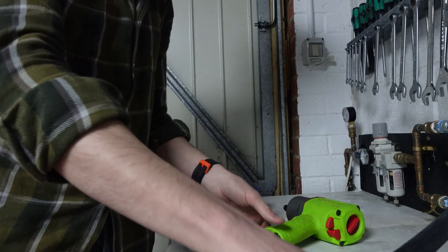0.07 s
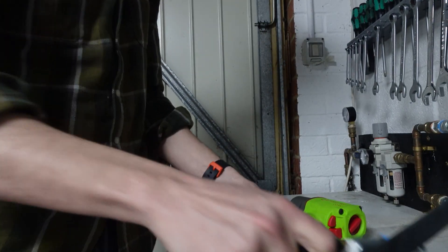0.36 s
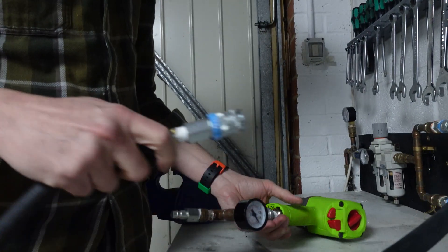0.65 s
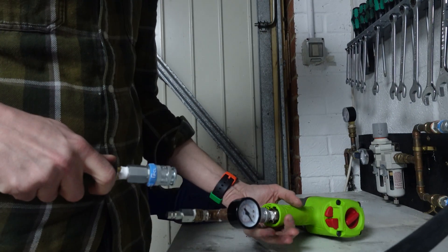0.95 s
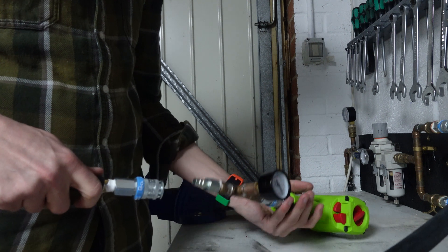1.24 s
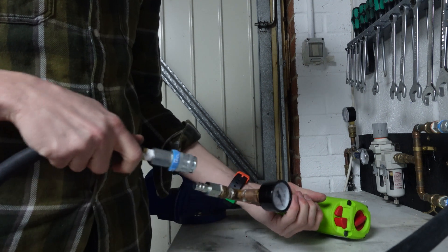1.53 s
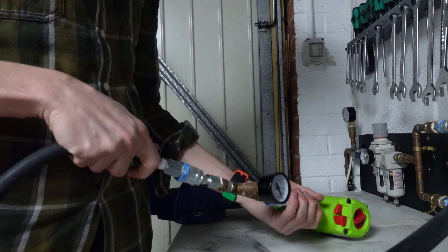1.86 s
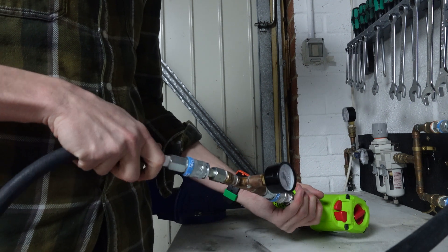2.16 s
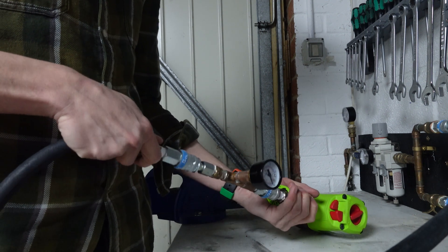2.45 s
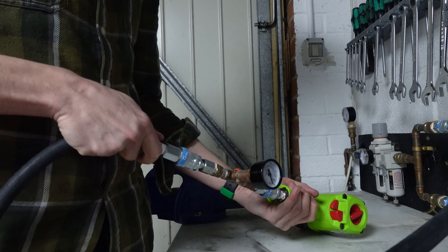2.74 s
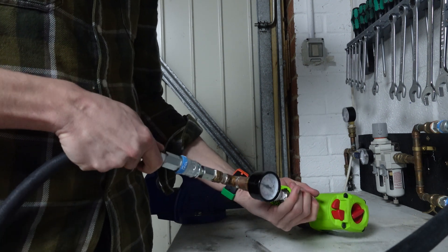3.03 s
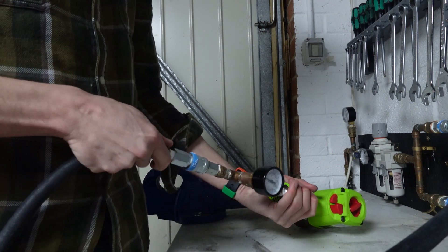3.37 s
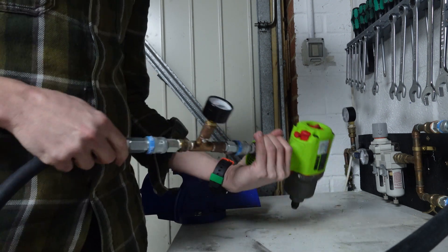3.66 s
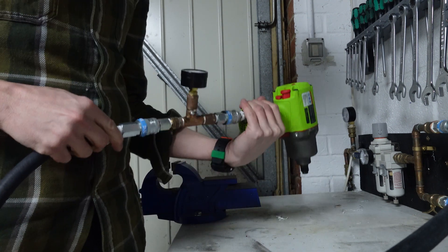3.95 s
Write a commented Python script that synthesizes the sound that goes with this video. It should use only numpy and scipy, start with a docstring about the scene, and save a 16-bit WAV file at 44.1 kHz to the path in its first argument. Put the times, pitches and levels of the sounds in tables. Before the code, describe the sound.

Metal clicks of an air hose being coupled to a tool, with dull workbench bumps.

```python
"""A small workshop, one microphone close to the bench, where an air hose is coupled to an air tool.
First the tool is dragged nearer and bumps on the booming bench top. The steel coupler taps and clicks
on the plug; around 3 s the seal leaks briefly, then the plug slides home and the coupler snaps shut
with a puff of air. Last, the tool is scraped off the bench and lifted, ringing faintly.
Sleeves and hose rustle throughout, over a low hum and the room's short echo."""
import sys
import numpy as np
from scipy import signal
from scipy.fft import rfft, irfft
from scipy.io import wavfile

SR = 44100
rng = np.random.default_rng(int(sys.argv[2]) if len(sys.argv) > 2 else 0)


def wrap_up_sound(samples):
    """Save the sound to the file named by the first command line argument, as 16-bit audio."""
    columns = np.atleast_2d(samples).T
    # keep every value between -1 and 1, then stretch to whole-number steps
    tamed = np.clip(columns, -1, 1)
    steps = np.round(tamed * 32767).astype(np.int16)
    wavfile.write(sys.argv[1], SR, steps)


N = 176400
TIME = np.arange(N) / SR

# modes of the steel coupler, damped by the hand: f/Hz, level/dB, t60/s
COUPLER_MODES = [(576, 14, 0.023), (1073, 4, 0.0083), (1490, 18, 0.035), (1767, 14, 0.0067),
                 (2085, 9.5, 0.019), (3205, 11.5, 0.025), (3635, 1.5, 0.07), (4550, 8, 0.028),
                 (5250, -1, 0.013), (6190, 5.5, 0.024), (6990, 7, 0.062), (11170, 0, 0.013)]
# edges of the four bands that colour a contact: f/Hz
CONTACT_EDGES = [300, 1200, 2500, 8800, 17000]
GRIP_SPREAD_DB, GRIP_DETUNE, GRIP_MAX_T60_S = 4.5, 0.055, .04
FIRST_IMPACT, REBOUNDS_PER_S = 3.24, 14000


def contact(bands_db, decay_s):
    """A hard impact and a run of tiny rebounds ring the coupler; the grip alters each touch's ring."""
    t = TIME[:SR // 8]
    force = rng.standard_normal(len(t)) * (rng.random(len(t)) < REBOUNDS_PER_S / SR)
    force *= np.exp(-t / decay_s)
    force[0] = FIRST_IMPACT
    modes = [(hz * (1 + GRIP_DETUNE * rng.uniform(-1.02, 1)),
              db + GRIP_SPREAD_DB * rng.normal(),
              min(t60, GRIP_MAX_T60_S)) for hz, db, t60 in COUPLER_MODES]
    steel = force + resonate(force, modes)
    click = sum(from_db(db) * unit_rms(band(steel, low, high, order=3))
                for db, low, high in zip(bands_db, CONTACT_EDGES, CONTACT_EDGES[1:]))
    return click * np.sqrt(.004 * SR / len(t))  # a band's level is its energy as an rms over 4 ms


# bright steel clicks of the coupler, and dull knocks and catches of the tool on the bench:
# t/s, level/dB in each of the four contact bands (low to high), chatter decay/s
TAPS_AND_KNOCKS = [(0.119, -35, -42, -58, -55, 0.0056), (0.233, -29.5, -34, -38, -47, 0.0089),
                   (0.262, -31, -36, -42, -52, 0.005), (0.284, -31, -37, -35, -42, 0.002),
                   (0.3133, -23, -33, -51, -64, 0.0081), (0.436, -44, -50, -38, -39.5, 0.0051),
                   (0.508, -47, -44, -51, -54, 0.013), (0.535, -65, -49, -47, -60, 0.0063),
                   (0.692, -40.5, -35, -41, -49, 0.012), (1.030, -37.5, -50, -78, -86, 0.0019),
                   (1.164, -55, -45.5, -54, -59.5, 0.0056), (1.228, -48, -66, -81, -80, 0.0054),
                   (1.4395, -37.5, -34, -41, -43.5, 0.0067), (1.461, -33, -28.5, -35.5, -39, 0.0074),
                   (1.494, -37.5, -33.5, -41.5, -48, 0.019), (1.520, -50, -39, -45.5, -50.5, 0.0069),
                   (1.647, -46, -41, -49, -54.5, 0.0025), (1.8732, -37.5, -30, -39.5, -57, 0.0047),
                   (1.9204, -43.5, -37.5, -29.5, -45, 0.0043), (1.958, -47, -39, -60, -71, 0.004),
                   (1.966, -41, -31.5, -39, -51, 0.0075), (2.2111, -34.5, -39.5, -76, -99, 0.0013),
                   (2.337, -49.5, -49, -59.5, -64, 0.0034), (2.494, -50, -38, -40, -54, 0.0089),
                   (2.5153, -39, -27, -31.5, -43, 0.0029), (2.9231, -54, -52, -50.5, -55.5, 0.0056),
                   (3.1985, -36, -39.5, -46.5, -51, 0.0045), (3.4229, -38, -32.5, -31.5, -50, 0.0079),
                   (3.4427, -45.5, -33.5, -37, -54, 0.0025), (3.452, -41, -30.5, -42.5, -46, 0.0024),
                   (3.51, -50, -34, -49, -58, 0.011), (3.5522, -26.5, -26, -49, -60, 0.001)]
RATTLE_DB, RATTLE_FALL_DB_PER_S = -3.5, 344


def taps_and_knocks():
    """The coupler clicks, the tool knocks and catches; the low part of each rattles on in the bench."""
    out, t = np.zeros(N), TIME[:SR // 5]
    fade = from_db(-RATTLE_FALL_DB_PER_S * t)
    for s, *bands_db, decay_s in TAPS_AND_KNOCKS:
        rattle = unit_rms(band(rng.standard_normal(len(t)), 280, 800)) * fade
        add(out, s, contact(bands_db, decay_s))
        add(out, s, from_db(bands_db[0] + RATTLE_DB) * rattle)
    return out


# air leaking past the seal, then spitting past the plug: t/s, level/dB
LEAK_LEVEL = [(2.94,-84),(2.985,-72),(3.01,-54),(3.035,-53),(3.06,-81),(3.09,-81)]
SPIT_LEVEL = [(3.232,-56),(3.242,-33.5),(3.256,-28.5),(3.262,-29.5),(3.270,-50)]
# their spectra: f/Hz, relative level/dB
LEAK_SPECTRUM = [(1500,0.5),(3300,-5.5),(6500,-13),(8500,-18),(11000,-7),(12300,5),(13400,-3),(15000,-13)]
SPIT_SPECTRUM = [(500,-9),(1000,-6.5),(1700,-0.5),(2600,-8),(5000,-10.5),(13000,-27.5)]
FLUTTER_BAND_HZ, FLUTTER_DEPTH = (150, 600), 0.23


def escaping_air():
    """The seal hisses briefly, then air spits roughly as the entering plug opens the valve."""
    flutter = np.exp(FLUTTER_DEPTH * unit_rms(band(rng.standard_normal(N), *FLUTTER_BAND_HZ)))
    leak = envelope(LEAK_LEVEL) * noise(LEAK_SPECTRUM)
    spit = envelope(SPIT_LEVEL) * unit_rms(flutter * noise(SPIT_SPECTRUM))
    return leak + spit


# the locking sleeve's snap: level/dB in each of the four contact bands
SNAP_BANDS = [-55, -44, -32, -22.5]
# the puff of air after it: f/Hz, relative level/dB
PUFF_SPECTRUM = [(900,-11),(1700,-12),(3500,-18.5),(5200,-7),(8000,-15),(11000,-16),(13000,-2.5),(15000,-18)]
SNAP_AT_S, SNAP_DECAY_S = 3.2652, 0.00075
PUFF_DB, PUFF_FALL_DB_PER_S, PUFF_ATTACK_S = -36, 204, .003


def latch():
    """The coupler's sleeve snaps forward and a puff of air dies away."""
    snap = np.zeros(N)
    add(snap, SNAP_AT_S, contact(SNAP_BANDS, SNAP_DECAY_S))
    t = np.maximum(TIME - SNAP_AT_S, 0)
    puff_gain = from_db(PUFF_DB - PUFF_FALL_DB_PER_S * t) * np.minimum(t / PUFF_ATTACK_S, 1)
    return snap + puff_gain * noise(PUFF_SPECTRUM)


# the tool's bumps: t/s, level/dB, f/Hz, decay/s
TOOL_BUMPS = [(0.446,-16.5,201,0.004), (0.473,-21,82.5,0.024), (0.528,-22.5,108.5,0.015),
              (0.702,-25.5,194,0.004), (0.828,-16,126,0.0079), (1.031,-14.5,155.4,0.0099),
              (1.079,-21,87,0.04), (1.215,-27,167,0.0089), (1.278,-15.5,124,0.014), (1.463,-17,206,0.004),
              (1.499,-23,126,0.015), (1.875,-32.5,137,0.028), (1.972,-22.5,161,0.0073),
              (2.212,-10.5,164,0.0043), (2.253,-17,124.6,0.016), (2.3,-25,72.5,0.017),
              (2.493,-17,153,0.0072), (2.549,-14.5,174.6,0.005), (2.837,-27,127,0.017),
              (2.926,-18.5,175,0.0024), (2.994,-22.5,129,0.017), (3.085,-30.5,168.3,0.041),
              (3.206,-19.5,171.7,0.016), (3.228,-20.5,219,0.0064), (3.314,-15.5,170.4,0.014),
              (3.456,-16,156,0.017), (3.505,-19,194,0.01), (3.553,-10.5,202,0.0063),
              (3.614,-20.5,134.3,0.059)]
BUMP_ATTACK_S, BUMP_LOWPASS_HZ = 0.00085, 5800


def tool_bumps():
    """The tool bumps on the bench and in the hand, a few dull cycles each time."""
    thuds, t = np.zeros(N), TIME[:SR // 3]
    attack = 1 - np.exp(-t / BUMP_ATTACK_S)
    for s, db, hz, decay_s in TOOL_BUMPS:
        add(thuds, s, from_db(db) * np.sin(2 * np.pi * hz * t) * attack * np.exp(-t / decay_s))
    return lowpass(thuds, BUMP_LOWPASS_HZ)


# the tool dragged over the bench, one curve per stroke: t/s, level/dB
DRAG_STROKES = [
    [(.115,-76),(.121,-37),(.15,-43),(.183,-45),(.194,-27.5),(.29,-28.5),(.33,-39),(.40,-39.5),(.45,-76)],
    [(1.228,-40),(1.26,-43),(1.318,-50.5),(1.330,-38.5),(1.39,-46.5),(1.43,-54)],
    [(3.13,-53),(3.21,-44.5),(3.39,-75),(3.46,-41.5),(3.54,-41)],
    [(3.55,-47),(3.567,-27),(3.68,-41),(3.76,-68)],
]
# scrape of its housing and of its hard nose: f/Hz, relative level/dB
HOUSING_SPECTRUM = [(200,-2),(330,6.5),(460,6.5),(900,-4),(1600,-21.5),(2400,-22.5),(4000,-38.5),(9000,-44.5)]
NOSE_SPECTRUM = [(800, 2.5), (1750, 0.5), (2500, -12), (3800, -14.5), (8000, -46)]
NOSE_DB, SLIPS_PER_S, SLIP_SPREAD_DB = -4.5, 1000, 4.5


def tool_drags():
    """The housing judders over the bench top; the hard nose adds grit to the last stroke."""
    housing = coloured(stick_slip(), HOUSING_SPECTRUM) * sum(map(envelope, DRAG_STROKES))
    nose = coloured(stick_slip(), NOSE_SPECTRUM) * envelope(DRAG_STROKES[-1])
    return housing + from_db(NOSE_DB) * nose


def stick_slip():
    """Surfaces catch and let go: dense tiny impacts of uneven size."""
    sizes = from_db(SLIP_SPREAD_DB * np.minimum(rng.exponential(1, N), 2))
    signs = rng.choice([-1, 1], N)
    return sizes * signs * (rng.random(N) < SLIPS_PER_S / SR)


# modes of a steel part of the tool: f/Hz, level/dB, t60/s
LIFT_MODES = [(5292, -44, 0.19), (5322, -52, 0.4), (7950, -54.5, 0.25)]
LIFT_AT_S, LIFT_ATTACK_S = 3.563, 0.012


def lift_ring():
    """A steel part is rubbed into a thin ring as the tool leaves the bench."""
    t = np.maximum(TIME - LIFT_AT_S, 0)
    ring = sum(from_db(db - 60 * t / t60) * np.sin(2 * np.pi * hz * t) for hz, db, t60 in LIFT_MODES)
    return ring * np.minimum(t / LIFT_ATTACK_S, 1)


# modes of the workbench: f/Hz, relative level/dB, t60/s
BENCH_MODES = [(68, -3, 0.38), (83.4, -1, 0.87), (95.3, -4.5, 0.16), (123, -15, 0.61), (150.5, -16, 1),
               (217.6, 2, 0.17), (240.6, -1, 0.16), (307, 1.5, 1), (450, 4, 0.35), (580, -17, 0.98)]
BOOM_DB = -2


def bench_boom(touches):
    """Whatever touches the bench sets its low modes booming."""
    return from_db(BOOM_DB) * resonate(touches, BENCH_MODES)


# passes of a cloth sleeve: t/s, level/dB, half-length/s
SLEEVE_PASSES = [(0.932,-63.5,0.058),(1.384,-56,0.031)]
# the cloth's hiss: f/Hz, relative level/dB
SLEEVE_SPECTRUM = [(3500,-3),(5800,1),(9000,-7.5),(14000,-16)]


def sleeve_swishes():
    """A sleeve brushes past: a bright hiss that swells and fades."""
    swells = sum(from_db(db) * np.exp(-.5 * ((TIME - s) / width) ** 2) for s, db, width in SLEEVE_PASSES)
    return swells * noise(SLEEVE_SPECTRUM)


# rustle and rumble of the work at the bench: t/s, level/dB
RUSTLE_LEVEL = [(0,-49),(.36,-52),(.66,-60),(.72,-50.5),(.81,-60),(1.05,-62.5),(1.28,-55.5),(1.43,-62),(1.54,-52),(1.75,-67),(2.42,-62),(2.9,-67.5),(3.15,-55),(3.55,-51),(3.85,-56.5),(4.1,-75)]
RUMBLE_LEVEL = [(0,-42),(.25,-34.5),(.6,-33.5),(.78,-42.5),(1.5,-31),(1.8,-45.5),(2.4,-36),(2.8,-47),(3.15,-35),(3.6,-29.5),(3.8,-38.5),(4,-48.5)]
# their spectra: f/Hz, relative level/dB
RUSTLE_SPECTRUM = [(400,21),(2000,6),(3500,1),(5500,-3),(8000,-7.5),(12000,-12),(16000,-19)]
RUMBLE_SPECTRUM = [(40,-11),(90,12.5),(120,-4.5),(200,-10),(300,-17.5),(1000,-41.5),(3000,-59.5)]


def handling():
    """Sleeves and hose rustle over the low rumble of handling."""
    rustle = envelope(RUSTLE_LEVEL) * noise(RUSTLE_SPECTRUM)
    rumble = envelope(RUMBLE_LEVEL) * noise(RUMBLE_SPECTRUM)
    return rustle + rumble


# the workshop's echo: f/Hz, level/dB, t60/s
ECHO_BANDS = [(147,-5,0.28),(610,-9,0.18),(1620,-13,0.34),(4000,-10.5,0.27),(8000,-15.5,0.23),(15000,-15.5,.18)]
ECHO_DELAY_S = 0.0059


def workshop_echo(direct):
    """The room returns a diffuse tail just after the direct sound, each band dying at its own rate."""
    t, edges = TIME[:SR * 2 // 3], np.geomspace(130, 17000, 10)
    hz, db, t60 = np.transpose(ECHO_BANDS)
    tail = 0
    for low, high in zip(edges, edges[1:]):
        log_centre = np.log(low * high) / 2
        band_db, band_t60 = (np.interp(log_centre, np.log(hz), column) for column in (db, t60))
        fade = from_db(-60 * t / band_t60) * (t > ECHO_DELAY_S)
        reflections = rng.standard_normal(len(t)) * fade / np.linalg.norm(fade)
        tail = tail + from_db(band_db) * band(reflections, low, high)
    return signal.fftconvolve(direct, tail)[:N]


# the workshop at rest: f/Hz, relative level/dB
ROOM_TONE_SPECTRUM = [(30,10.5),(45,-5),(90,-19),(140,-19),(400,-31),(1500,-41),(4000,-69),(15000,-45)]
ROOM_TONE_DB, HUM_DB, HUM_BAND_HZ = -52.5, -49, (87.83, 91.53)


def room_tone():
    """The room's own steady noise and a low, wavering hum."""
    hum = unit_rms(band(rng.standard_normal(N + SR), *HUM_BAND_HZ)[SR:])  # 1 s to settle
    return from_db(ROOM_TONE_DB) * noise(ROOM_TONE_SPECTRUM) + from_db(HUM_DB) * hum


def from_db(db):
    """Decibels to gain."""
    return 10 ** (np.asarray(db) / 20)


def unit_rms(x):
    """Scale to rms 1."""
    return x / np.sqrt(np.mean(x ** 2) + 1e-20)


def envelope(curve):
    """Gain along a (t/s, level/dB) curve, silent outside it."""
    s, db = np.transpose(curve)
    return from_db(np.interp(TIME, s, db, left=-200, right=-200))


def band(x, low, high, order=2):
    """Causal band-pass, edges in Hz."""
    return signal.sosfilt(signal.butter(order, [low, high], "band", fs=SR, output="sos"), x + 1e-18)


def lowpass(x, hz, order=2):
    """Causal low-pass."""
    return signal.sosfilt(signal.butter(order, hz, fs=SR, output="sos"), x)


def coloured(x, spectrum):
    """Give a steady sound a (f/Hz, level/dB) spectrum that falls away at both ends; rms 1."""
    hz, db = np.transpose(spectrum)
    f = np.maximum(np.arange(N // 2 + 1) * SR / N, 1)
    skirts = np.minimum(f / hz[0], 1) ** 2 * np.minimum(hz[-1] / f, 1) ** 2
    gain = from_db(np.interp(np.log(f), np.log(hz), db))
    return unit_rms(irfft(rfft(x) * skirts * gain, N))


def noise(spectrum):
    """Steady noise of a given spectrum; rms 1."""
    return coloured(rng.standard_normal(N), spectrum)


def resonate(x, modes):
    """Drive parallel resonances (f/Hz, peak gain/dB, t60/s)."""
    out = 0
    for hz, db, t60 in modes:
        radius = np.exp(-np.log(1000) / (t60 * SR))
        forward = np.array([1, 0, -1]) * (1 - radius ** 2) / 2
        feedback = [1, -2 * radius * np.cos(2 * np.pi * hz / SR), radius ** 2]
        out = out + from_db(db) * signal.lfilter(forward, feedback, x + 1e-18)
    return out


def add(track, s, x):
    """Mix a short sound in at s seconds."""
    start = max(int(s * SR), 0)
    track[start:start + len(x)] += x[:N - start]


def scene():
    """At the bench: coupler, air and tool up close with their echo, rustle and room tone behind."""
    touches = tool_bumps() + tool_drags() + lift_ring() + taps_and_knocks()
    direct = touches + bench_boom(touches) + escaping_air() + latch()
    return (direct + workshop_echo(direct) + sleeve_swishes() + handling() + room_tone())[None]


def record(dry):
    """The microphone fades above 14.5 kHz and is cut steeply at 16 kHz."""
    softened = lowpass(dry, 14500, order=5)
    return signal.sosfilt(signal.ellip(10, .1, 80, 16000, fs=SR, output="sos"), softened)


dry = scene()
out = record(dry)
wrap_up_sound(out)
```